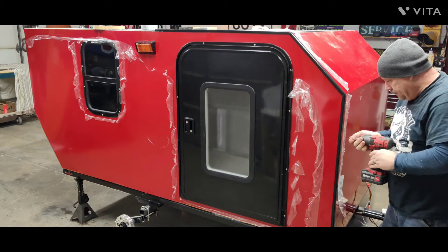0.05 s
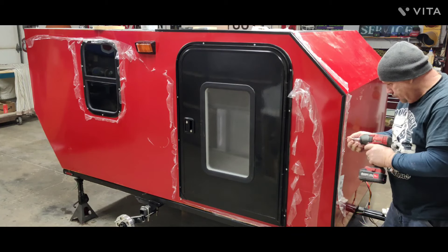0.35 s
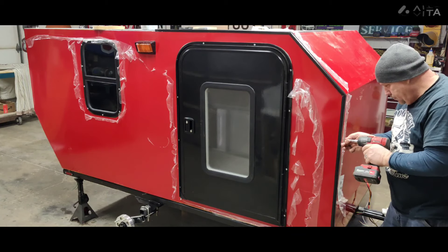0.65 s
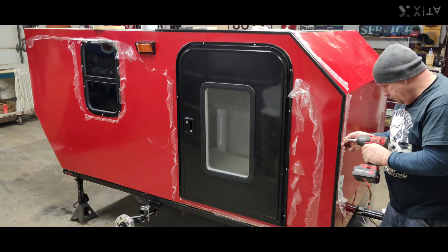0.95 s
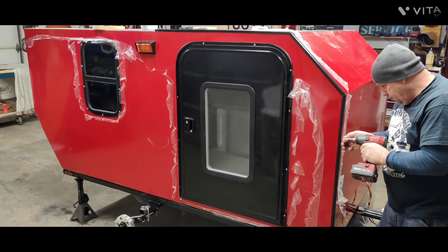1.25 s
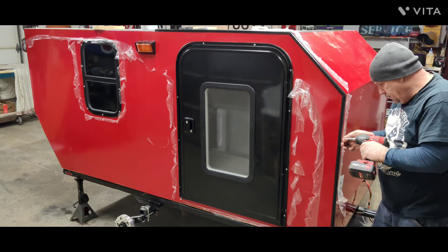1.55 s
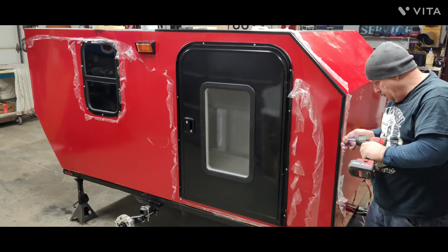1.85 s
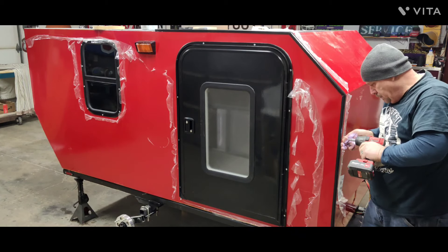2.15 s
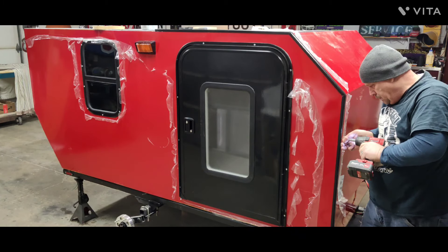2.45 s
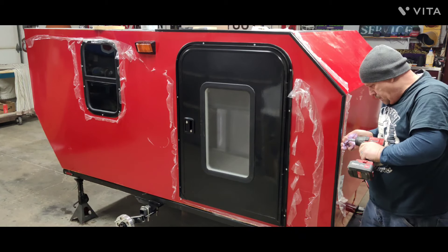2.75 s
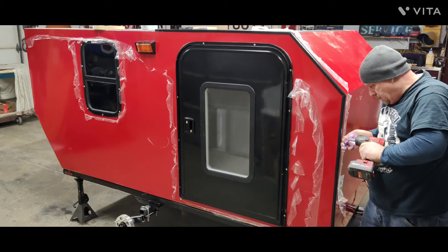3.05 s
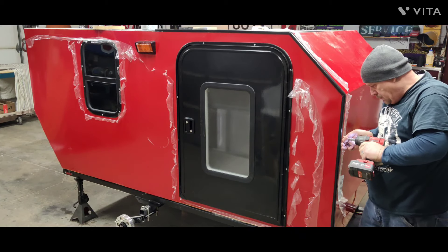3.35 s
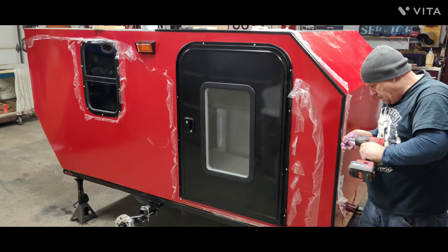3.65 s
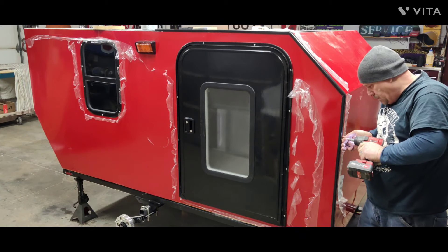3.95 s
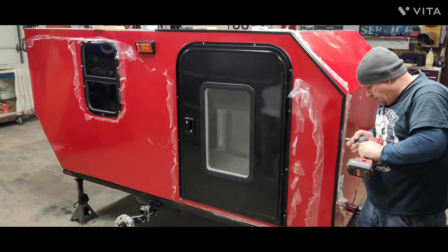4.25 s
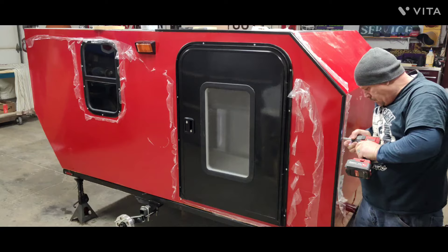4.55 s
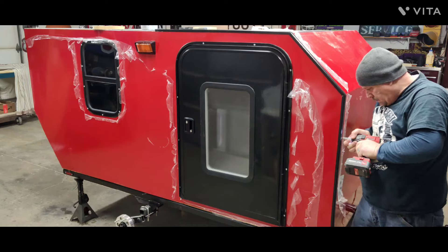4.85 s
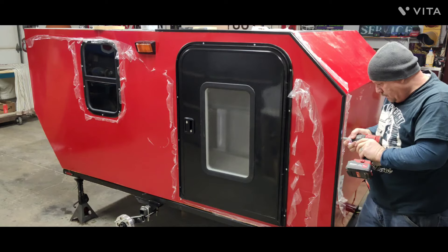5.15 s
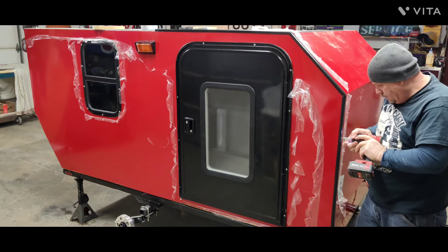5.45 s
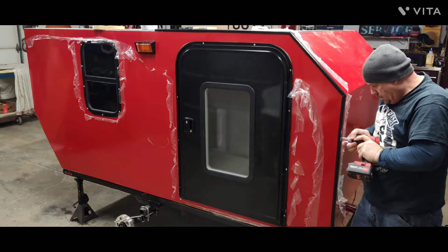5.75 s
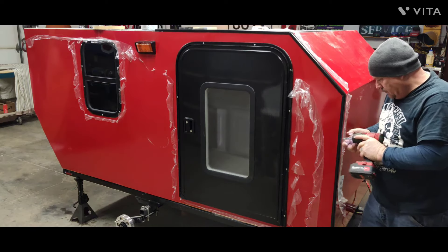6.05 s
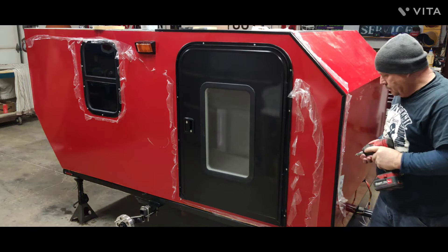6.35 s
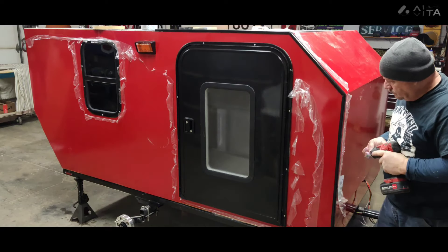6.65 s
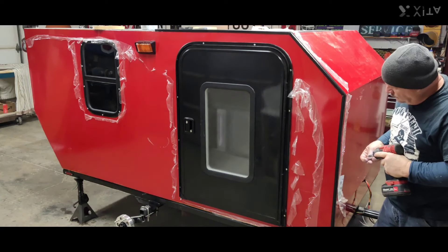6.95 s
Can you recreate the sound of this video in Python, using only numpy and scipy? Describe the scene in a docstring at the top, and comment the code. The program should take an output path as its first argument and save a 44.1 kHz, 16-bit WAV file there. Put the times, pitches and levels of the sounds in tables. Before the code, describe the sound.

In a workshop, a fan hums over a steady rumble and hiss. Screws tick faintly, then a cordless driver gives seven short bursts, its gears rattling and whining, several with a thin whistle. The bit clacks in the screw head and knocks a hollow trailer wall. After a soft gear rasp and more ticks, the last and longest burst chatters and grinds into metal trim. The hard walls ring briefly in stereo.

```python
"""A cordless driver runs screws into the metal trim of a small trailer, in seven short bursts.
Its speed control whistles, its gears rattle and whine up to speed, and it knocks the hollow wall.
Screws grind in the metal, and now and then the bit skips out of the screw head.
Between bursts, screws tick and the gears give one soft rasp.
A fan hums over a steady rumble and hiss, and the workshop's hard walls ring after every burst."""
import sys
import numpy as np
from scipy import signal
from scipy.fft import rfft, irfft
from scipy.io import wavfile
from scipy.ndimage import uniform_filter1d

SR = 44100
rng = np.random.default_rng(int(sys.argv[2]) if len(sys.argv) > 2 else 0)


def transcribe(u):
    """Save the signal u as a 16-bit wav file named by the first command-line argument.

    u: samples, shape (n,) or (channels, n), limited to [-1, 1]; the rate is SR.
    q: integer samples, one column per channel.
    """
    v = np.clip(np.atleast_2d(u).T, -1, 1)
    q = np.round(v * 32767).astype(np.int16)
    wavfile.write(sys.argv[1], SR, q)


N = 313110
TIME = np.arange(N) / SR

# Steady background rumble and hiss: frequency_hz, level_db
BACKGROUND_SPECTRUM = [(12, -57), (20, -26.5), (45, -12), (64, 2), (92, -23.5), (133, -19.5), (324, -19.5),
                       (416, -26), (452, -15), (705, -19.5), (881, -20.5), (1500, -21), (2760, -29.5),
                       (4810, -28.5), (8000, -41), (15500, -60.5)]
# The tones in the fan's hum: pitch_hz, level_db
FAN_TONES = [(54, -74.5), (62.8, -75), (113, -79), (231, -79.5), (446.8, -74), (888, -83), (1007, -78.5)]
# Screws and bit touching: start_s, level_db, pitch_hz, width_hz
TICKS = [(0.1103, -51.5, 2670, 2240), (0.108, -54.5, 4540, 1230), (0.304, -53.5, 5670, 1510),
         (0.391, -55.5, 1120, 500), (3.2522, -38.5, 1127, 600), (5.111, -62, 6400, 900),
         (5.214, -57, 6520, 1990), (5.3764, -47.5, 6150, 3200), (5.378, -49.5, 3130, 2236),
         (5.385, -53, 5620, 2990)]
# Whistles while the trigger is part way in: start_s, length_s, level_db, pitch_hz
WHISTLES = [(1.949, 0.14, -48.5, 3657), (2.583, 0.064, -51.5, 3570), (2.875, 0.115, -55.5, 3624),
            (3.207, 0.064, -51, 3630), (3.682, 0.025, -48.5, 3560), (5.745, .03, -50, 3570)]
# Trigger pulls (whine and fizz are relative to the rattle):
# start_s, held_s, spin_up_s, curve_shape, top_turns_per_s, level_db, whine_db, fizz_db
PULLS = [(1.98, 0.16, 0.09, 1.22, 276.7, -34.5, -6, -33.5),
         (2.594, 0.12, 0.035, 1.33, 292.1, -39.5, -3.5, -40),
         (2.906, 0.13, 0.044, 1.34, 285.2, -37, -4.5, -21.5),
         (3.214, 0.11, 0.037, 1.7, 296.6, -39.5, -0.5, -28.5),
         (3.681, .15, .039, 1.7, 318.6, -31.5, 0.5, -16.5),
         (4.419, 0.16, 0.032, 1.14, 325.2, -33, 0.5, -17.5),
         (5.733, 0.37, 0.017, 1.22, 250.4, -37.5, -14, -24)]
# The whine of motor and gears: cycles_per_turn, level_db, jitter_rad, speeding_up_boost_db
WHINE_TONES = [(.75, -25, .2, 0), (1, -18, .2, 0), (3, -15, .7, 3), (4, -7, .5, 7), (4.93, -6, .4, 0),
               (9.7, -14, .4, 0), (12, -4.5, .15, 0), (13.9, -13, .4, 0), (14.5, -10, .35, 0),
               (14.8, -7, .25, 10), (20.25, -6, .35, 0), (24.7, -12, .5, 0)]
# The rattle of the gears: frequency_hz, level_db
GEAR_SPECTRUM = [(100, -29), (170, -16.5), (240, -5), (420, -13.5), (650, -1.5), (1300, 0.5), (2000, -1.5),
                 (2400, -8), (3200, -1), (5500, -4), (7700, -7), (9300, -19.5), (11500, -32.5),
                 (15500, -35.5)]
# Where the gear housing rings: pitch_hz, width_hz, boost_db
HOUSING_RINGS = [(1170, 130, 5.2), (1602, 150, 1.6), (4000, 1100, 2.8), (4580, 350, 4), (6510, 500, 9.6),
                 (7330, 100, 2.8)]
# The fine fizz of scraped metal: frequency_hz, level_db
FIZZ_SPECTRUM = [(3000, -42), (6500, -14.5), (8700, 0.5), (10200, 1), (12000, -3), (15500, -3.5)]
# The bit drops into the screw head or jumps out:
# start_s, crack_db, thud_db, decay_s, ring_hz, ring_boost_db, fizz_db
KNOCKS = [(2.0747, -17.5, -25, 0.0016, 739, 11, -50), (2.0832, -8.5, -24, 0.0013, 1450, 3.5, -29.5),
          (2.094, -16, -24.5, 0.0012, 740, 13, -48), (2.1053, -28.5, -36.5, 0.00078, 6500, 9, -58),
          (2.112, -28.5, -35, 0.0013, 6390, 13.5, -58.5), (2.172, -43, -42, 0.0022, 1200, 10, -70),
          (2.989, -36.5, -35.5, 0.003, 6500, 21, -66), (3.069, -34, -38, 0.0013, 6500, 6, -69),
          (3.326, -41, -31.5, 0.013, 6510, 2.5, -71.5), (3.3998, -24.5, -34, 0.00079, 1150, 12.5, -73),
          (3.424, -45, -44, 0.0053, 1230, 18.5, -82), (3.8479, -39, -21, 0.0018, 600, 4, -72),
          (3.8548, -13, -14.5, 0.0016, 4575, 11, -34), (3.868, -21, -23.5, 0.0021, 6480, 7.5, -40),
          (3.8839, -31, -28.5, .003, 6430, 3, -61), (3.922, -45, -35, 0.0031, 600, 5, -70),
          (4.6275, -26, -30.5, 0.002, 694, 5, -58), (5.744, -36.5, -38, 0.0031, 1100, 11, -69),
          (5.757, -26.5, -26, 0.0013, 1100, 12, -60.5), (5.7815, -15, -14, 0.0011, 3600, 4, -46),
          (5.788, -12, -16.5, 0.0016, 3620, 11, -33), (5.795, -20.5, -28.5, 0.0013, 4216, 6.5, -38),
          (5.821, -14, -31, 0.0019, 3574, 13.5, -31.5), (5.847, -23.5, -29, 0.0028, 4600, 6, -37.5),
          (5.872, -18.5, -32, 0.0022, 3600, 7, -29.5), (5.897, -22.5, -23, 0.0037, 6500, -5, -30.5),
          (5.9241, -22, -26.5, 0.0032, 3400, 3, -35), (6.018, -29, -46, 0.00084, 3600, 0, -66)]
# The crack of steel on steel: frequency_hz, level_db
CRACK_SPECTRUM = [(120, -38), (400, -7.5), (750, 0.5), (1300, 3.5), (2200, -4.5), (3500, -2), (5400, -2),
                  (7200, -3), (9000, -15.5), (10500, -25.5), (12500, -33), (15500, -40.5)]
# The trailer wall's own tones (ring_s is the time to fade by 60 dB): pitch_hz, level_db, ring_s
WALL_TONES = [(91, -35, 0.3), (202, -22, 0.2), (230, -15.5, 0.32), (278.2, -11.5, 0.22), (326, -8, 0.16),
              (363, -24.5, 0.088), (505.4, -6.5, 0.07), (557, -9, 0.2), (566.6, 3, 0.05),
              (652.6, 1.5, 0.06), (714, -2, 0.064), (825, -15.5, 0.092), (1217, -12.5, 0.067)]
# The driver shoves the wall: start_s, pitch_hz, level_db, ring_s
SHOVES = [(2.082, 99, -49, 0.48), (2.084, 170.3, -45, 0.29), (3.854, 145, -45.5, .35),
          (3.853, 221.7, -34.5, 0.33), (3.853, 327.6, -32, .3), (4.569, 135.4, -58, .4),
          (5.778, 318, -19.5, .08), (5.777, 480, -20, .09)]
# A screw cuts into trim and wall (a negative fade grows louder):
# start_s, length_s, grind_db, grind_fade_db_per_s, groan_db, groan_fade_db_per_s
BITES = [(3.848, 0.18, -39, 158.5, -30, 107.5), (4.531, 0.13, -41.5, 5.5, -45.5, 9),
         (5.764, .295, -25.5, 52.5, -46, -16)]
# Where the metal trim rings: pitch_hz, width_hz, boost_db
TRIM_RINGS = [(569, 110, 16), (1070, 200, 6), (1248, 300, 7), (2060, 400, 10), (2780, 530, 5),
              (3570, 200, 3)]
# The low groan of the wall: frequency_hz, level_db
GROAN_SPECTRUM = [(150, -40), (200, -6), (235, -3.5), (280, -8.5), (330, -5), (400, -12), (520, -17.5),
                  (1000, -45)]
# The rasp of slowly turning gears: frequency_hz, level_db
RASP_SPECTRUM = [(200, -33), (480, -9.5), (780, 4), (1150, -6), (1700, -8), (2600, -20), (3400, -5.5),
                 (4600, -16), (6500, -21.5), (8500, -27), (12000, -60)]
# Stretches of time with their own room echo and left-right delay: start_s, end_s, left_lag_s
ECHO_STRETCHES = [(0, 2.55, .00016), (2.55, 2.87, .00016), (2.87, 3.2, .00016), (3.2, 3.65, .00016),
                  (3.65, 4.3, .00016), (4.3, 5.6, .00016), (5.6, 7.2, -.0003)]
# Echoes from nearby surfaces: delay_s, level_db
ECHOES = [(.0023, -2.5), (.0052, -5.5), (.0087, -14.5), (.0118, -14.5), (.021, -14.5)]
# How long the room takes to fade by 60 dB: frequency_hz, ring_s
ROOM_RING_TIMES = [(100, 0.62), (250, 0.26), (600, 0.33), (1400, 0.35), (2600, 0.46), (4500, 0.57),
                   (6000, 0.58), (9000, 0.41), (12000, .17)]
# How strongly the room rings: frequency_hz, level_db
ROOM_SPECTRUM = [(100, -9.5), (300, -3), (600, -13), (1200, -4), (2500, -2), (5000, -1), (9000, -1),
                 (13000, -7)]


def amp(db):
    """Turns decibels into a number to multiply by."""
    return 10 ** (np.asarray(db) / 20)


def unit_level(x):
    """Scales a signal to an average (rms) level of 1."""
    return x / np.sqrt(np.mean(x ** 2) + 1e-20)


def look_up(points, hz):
    """Reads between a table's rows, on a log-frequency scale."""
    f, value = np.transpose(points)
    return np.interp(np.log(hz + 1), np.log(f + 1), value)


def add(mix, start_s, sound):
    """Adds a sound to the mix at its start time."""
    part = mix[round(start_s * SR):][:len(sound)]
    part += sound[:len(part)]


def drift(t, hz):
    """A smooth random wobble of size about 1, no faster than about hz."""
    f = np.fft.rfftfreq(8192, 1 / 1000)
    slow = unit_level(irfft(rfft(rng.standard_normal(8192)) / (1 + (f / hz) ** 4)))
    return np.interp(t, np.arange(8192) / 1000, slow)


def colour(x, spectrum, rings=(), size=4096):
    """Gives a sound a broad tone colour, with peaks where an object rings."""
    hz = abs(np.fft.fftfreq(size, 1 / SR))
    peaks_db = sum(boost / (1 + (2 * (hz - f) / width) ** 2) for f, width, boost in rings)
    log_gain = np.log(amp(look_up(spectrum, hz) + peaks_db))
    response = np.exp(np.conj(signal.hilbert(log_gain)))  # rings after a hit, never before
    taps = np.fft.ifft(response).real[:size // 2]
    return signal.oaconvolve(x, taps / np.linalg.norm(taps))[:len(x)]


def stereo_noise(size, spacing_m=0.34):
    """Noise spectra at two microphones: alike in the bass, unrelated in the treble."""
    a, b = rfft(rng.standard_normal((2, size)))
    alike = np.sinc(2 * np.linspace(0, SR / 2, len(a)) * spacing_m / 343)
    return np.array([a, alike * a + np.sqrt(1 - alike ** 2) * b])


def background(noise_db=-58.46, hum_boost_db=0.6, waver_db=1.5):
    """Steady background rumble and hiss, with a gently wavering hum."""
    hz = np.fft.rfftfreq(N, 1 / SR)
    noise = unit_level(irfft(stereo_noise(N) * amp(look_up(BACKGROUND_SPECTRUM, hz)), N))
    hum = 0
    for pitch_hz, db in FAN_TONES:
        level = amp(db + hum_boost_db - waver_db * drift(TIME, 4.1))
        hum += level * np.sin(2 * np.pi * pitch_hz * TIME + 0.68 * drift(TIME, 2.3))
    return amp(noise_db + 0.15 * drift(TIME, 1.7)) * noise + np.sqrt(2) * hum


def screw_ticks(decay_s=0.0041):
    """Small steel parts touch and ring briefly."""
    t, out = TIME[:SR // 20], np.zeros(N)
    for start_s, db, hz, width_hz in TICKS:
        touch = rng.standard_normal(len(t)) * np.exp(-t / decay_s)
        peak = signal.iirpeak(hz, hz / width_hz, fs=SR)
        ring = signal.lfilter(*peak, signal.lfilter(*peak, touch))
        ring = signal.lfilter(*signal.butter(4, 7800, fs=SR), ring)
        add(out, start_s, amp(db) * ring / np.std(ring[:SR // 300]))
    return out


def whistle(length_s, level_db, pitch_hz, sharp_hz=160, settle_s=0.019, wander_hz=54.7, octave_db=-22):
    """The speed control chops the current, so the motor's coils sing a hoarse, slightly falling note."""
    t = np.arange(0, length_s, 1 / SR)
    hz = pitch_hz + sharp_hz * np.exp(-t / settle_s) + wander_hz * drift(t, 40)
    phase = 2 * np.pi * np.cumsum(hz) / SR
    flutter = 1 + 1.3 * (drift(t, 190) + 1j * drift(t, 190))  # shakes both level and phase
    tone = (flutter * (np.exp(1j * phase) + amp(octave_db) * np.exp(2j * phase))).real
    return amp(level_db) * signal.windows.tukey(len(t), .7) * unit_level(tone)


def gear_rattle(turns, pace, strain, fizz_db, teeth_per_turn=4.93, clash=0.76, spread_db=4.9):
    """Teeth clash in the housing, growling as they speed up and sounding brighter when fast."""
    tooth = teeth_per_turn * turns
    force = amp(spread_db * rng.standard_normal(N))[tooth.astype(int)]  # each tooth hits differently
    force *= 1 + 0.22 * np.cos(2 * np.pi * turns)  # the motor wobbles once a turn
    hits = 3 * clash * force * np.exp(-(tooth % 1) / 0.93)
    grit = unit_level((1 - clash + hits) * rng.standard_normal(N)[:len(turns)])
    rattle = colour(grit, GEAR_SPECTRUM, HOUSING_RINGS)
    growl = signal.lfilter(*signal.butter(1, 2100, fs=SR), rattle)
    fizz = amp(fizz_db) * colour(grit, FIZZ_SPECTRUM)
    return growl * (1 + strain) + (rattle - growl) * pace ** 0.14 + fizz


def gear_whine(t, turns, pace, strain):
    """The motor and meshing teeth sing tones that rise with speed."""
    whine = 0
    for per_turn, db, jitter_rad, boost_db in WHINE_TONES:
        level = amp(db + boost_db * np.tanh(2 * strain) + 2 * drift(t, 70))
        # the lowest and highest tones only come through near full speed
        level *= pace ** (3 if per_turn < 2 else per_turn / 6)
        phase = 2 * np.pi * (per_turn * turns + rng.random())
        whine += level * np.sin(phase + jitter_rad * drift(t, 200))
    return whine


def motor(held_s, spin_up_s, curve_shape, top_speed, level_db, whine_db, fizz_db, coast_s=.11, sag=.07):
    """One pull: the motor runs the gears up, sags as the screw tightens, then friction stops it."""
    t = np.arange(0, held_s + coast_s, 1 / SR)
    speed = top_speed * (1 - np.exp(-(t / spin_up_s) ** curve_shape))
    speed *= 1 - sag * np.minimum(t / held_s, 1) ** 8
    speed *= np.clip(1 - (t - held_s) / coast_s, 0, 1)
    turns_per_s = speed * (1 + .005 * drift(t, 60))
    turns = np.cumsum(turns_per_s) / SR
    pace = abs(turns_per_s) / 310  # about 1 at full speed
    strain = np.maximum(np.gradient(speed, t), 0) / 3700  # acceleration; 1 doubles the growl
    rattle = gear_rattle(turns, pace, strain, fizz_db)
    whine = amp(whine_db) * gear_whine(t, turns, pace, strain)
    return amp(level_db) * (speed / top_speed) ** 1.53 * (rattle + whine)


def bit_knocks(scrape=0.15, ring_width_hz=270, pitch_spread=.012):
    """The steel bit chatters, and its push rings the wall, never at quite the same pitch."""
    t, out = TIME[:SR // 3], np.zeros(N)
    for start_s, crack_db, thud_db, decay_s, ring_hz, boost_db, fizz_db in KNOCKS:
        age = 2 * t / decay_s
        chatter = rng.standard_normal(len(t)) * age * np.exp(1 - age)
        crack = amp(crack_db) * colour(chatter, CRACK_SPECTRUM, [(ring_hz, ring_width_hz, boost_db)])
        fizz = amp(fizz_db) * colour(chatter, FIZZ_SPECTRUM)
        push = signal.unit_impulse(len(t)) + scrape * chatter / np.linalg.norm(chatter)
        wall = 0
        for k, (hz, db, ring_s) in enumerate(WALL_TONES):
            tone = np.cos(2 * np.pi * hz * rng.normal(1, pitch_spread) * t)
            wall += (-1) ** k * amp(db - 60 * t / ring_s) * tone
        thud = .5 * amp(thud_db) * signal.fftconvolve(push, wall)[:len(t)]
        add(out, start_s, crack + fizz + thud)
    return out


def wall_booms(rise_s=.004):
    """The driver's weight lands on the wall, and the panel under it booms at its own pitch."""
    t, out = TIME[:SR // 2], np.zeros(N)
    for start_s, hz, db, ring_s in SHOVES:
        level = amp(db - 60 * t / ring_s) * (1 - np.exp(-t / rise_s))
        add(out, start_s, level * np.sin(2 * np.pi * hz * t))
    return out


def screw_bite(length_s, grind_db, grind_fade, groan_db, groan_fade, rise_s=0.0056, release_s=0.022,
               slips_per_s=2500, spread_db=2.5, fizz_db=-15, fizz_fade=60):
    """The screw sticks and slips in the trim, shaking the wall; the grind eases as the hole widens."""
    t = np.arange(0, length_s + release_s, 1 / SR)
    force = rng.standard_normal(N) * amp(spread_db * rng.standard_normal(N))
    slips = (force * (rng.random(N) < slips_per_s / SR))[:len(t)]
    grind = unit_level(colour(slips, CRACK_SPECTRUM, TRIM_RINGS))
    grind += amp(fizz_db - fizz_fade * t) * unit_level(colour(slips, FIZZ_SPECTRUM))
    groan = unit_level(colour(slips, GROAN_SPECTRUM))
    grip = np.minimum(t / rise_s, 1) * np.clip(1 - (t - length_s) / release_s, 0, 1)
    return grip * (amp(grind_db - grind_fade * t) * grind + amp(groan_db - groan_fade * t) * groan)


def gear_rasp(swell_s=.14, hold_s=.125, fade_s=0.0313, level_db=-50.5, teeth_per_s=170, spread_db=3):
    """Single teeth rub and stir the housing: a dull rasp that swells, brightens and stops."""
    t = np.arange(0, swell_s + hold_s, 1 / SR)
    tooth = teeth_per_s * t
    force = amp(spread_db * rng.standard_normal(SR))[tooth.astype(int)] * np.exp(-(tooth % 1))
    rasp = unit_level(colour(force * rng.standard_normal(N)[:len(t)], RASP_SPECTRUM, HOUSING_RINGS))
    dull = signal.sosfiltfilt(signal.butter(2, 1700, fs=SR, output="sos"), rasp)
    level = amp(level_db) * np.minimum(t / swell_s, 1) * np.minimum((swell_s + hold_s - t) / fade_s, 1)
    return level * (dull + (rasp - dull) * t / t[-1])


def workshop_echo(left_lag_s, direct_db=-3.0, build_s=0.00037):
    """How a click reaches two microphones: directly, off nearby surfaces, then from the whole room."""
    f, t = np.fft.rfftfreq(SR, 1 / SR), TIME[:SR]
    lags_s = np.array([[max(left_lag_s, 0)], [max(-left_lag_s, 0)]])
    near = amp(direct_db) * np.exp(-2j * np.pi * f * lags_s)
    for k, (delay_s, db) in enumerate(ECHOES):
        # echoes come from alternate sides, and rough surfaces smear them
        skew_s = (-1) ** k * rng.uniform(0, .0003) * np.array([[1], [-1]])
        smear = np.interp(f, np.linspace(0, SR / 2, 24), np.cumsum(rng.normal(0, 1.5, 24)))
        near += amp(db) * np.exp(1j * smear - 2j * np.pi * f * (delay_s + skew_s))
    hz, age_s, bands = signal.stft(irfft(stereo_noise(SR)), SR, nperseg=256)
    ring_s = look_up(ROOM_RING_TIMES, hz)[:, None]
    bands *= amp(look_up(ROOM_SPECTRUM, hz)[:, None] - 60 * age_s / ring_s)
    bands *= np.sqrt(2 * np.log(1000) / ring_s / SR)  # a longer ring gets no extra energy
    tail = signal.istft(bands, SR, nperseg=256)[1][:, :SR] * (1 - np.exp(-t / build_s))
    return (irfft(near) + tail)[:, :SR * 3 // 4]


def noise_suppressor(x, faint_db=-100, softness_db=4, cut_db=15.5, above_hz=2020):
    """Turns the treble down wherever it is faint, which shortens the room's ring."""
    frames = dict(nperseg=512, noverlap=384, scaling="psd")
    hz, _, bands = signal.stft(x, SR, **frames)
    power = 2 * (abs(bands) ** 2).mean(0)
    power = uniform_filter1d(uniform_filter1d(power, size=17, axis=0), size=5, axis=1)
    power_db = 10 * np.log10(abs(power) + 1e-20)
    faint = .5 + .5 * np.tanh((faint_db - power_db) / (2 * softness_db))
    treble = 1 - 1 / (1 + (hz[:, None] / above_hz) ** 16)
    return signal.istft(bands * amp(-cut_db * faint * treble), SR, **frames)[1][:, :N]


def scene():
    """The driver and the screws echo in the workshop, over the steady background."""
    tool = bit_knocks() + wall_booms() + screw_ticks()
    add(tool, start_s=4.88, sound=gear_rasp())
    for source, events in (whistle, WHISTLES), (motor, PULLS), (screw_bite, BITES):
        for start_s, *settings in events:
            add(tool, start_s, source(*settings))
    mix = background() * amp([[-.7], [.7]])  # a little louder on the right
    for start_s, end_s, left_lag_s in ECHO_STRETCHES:
        part = tool[round(start_s * SR):round(end_s * SR)]
        for side, echo in zip(mix, workshop_echo(left_lag_s)):
            add(side, start_s, signal.fftconvolve(part, echo))
    return mix


def record(dry):
    """Turns down faint treble, then cuts everything above 16 kHz."""
    low_pass = signal.firwin(511, 16000, window=("kaiser", 9), fs=SR)
    return signal.oaconvolve(noise_suppressor(dry), low_pass[None], "same")


dry = scene()
out = record(dry)
transcribe(out)
```